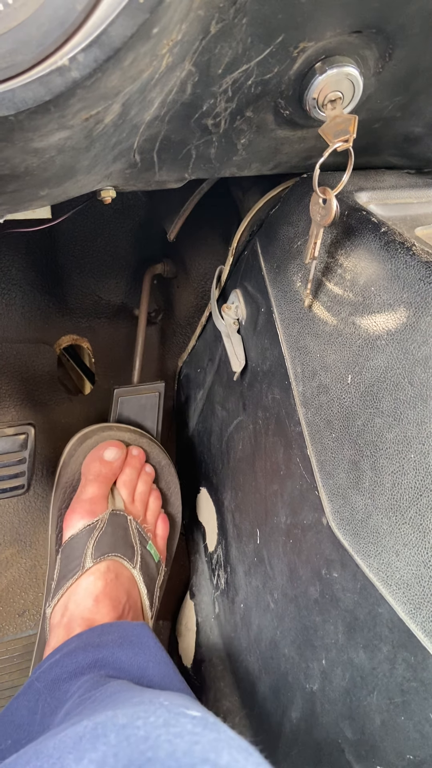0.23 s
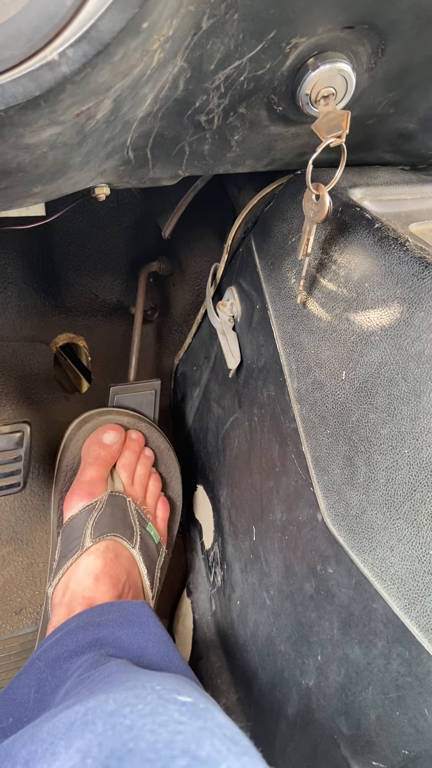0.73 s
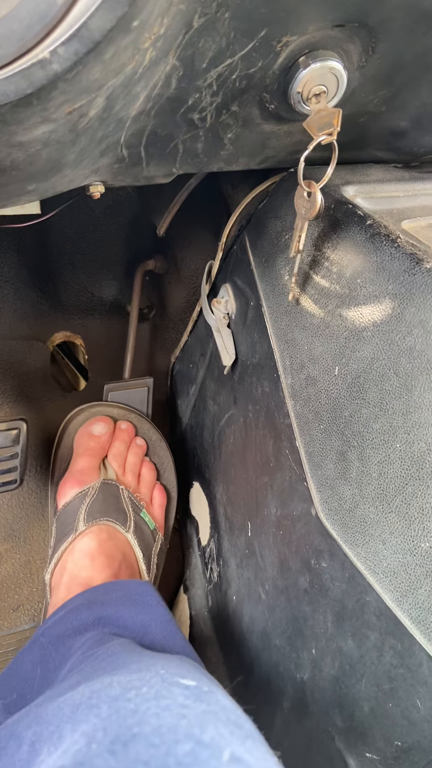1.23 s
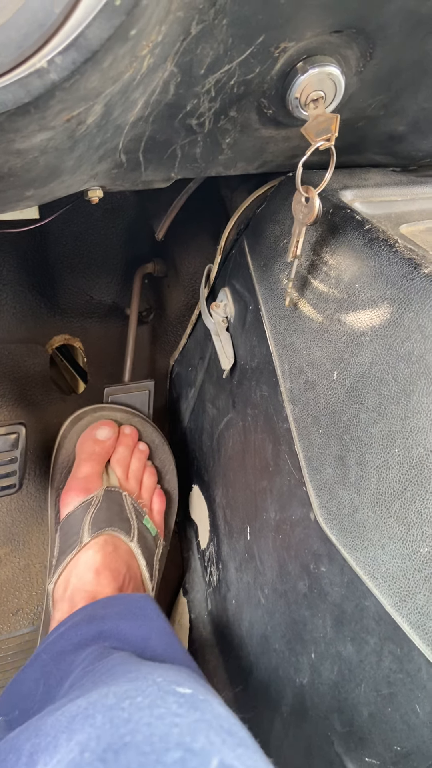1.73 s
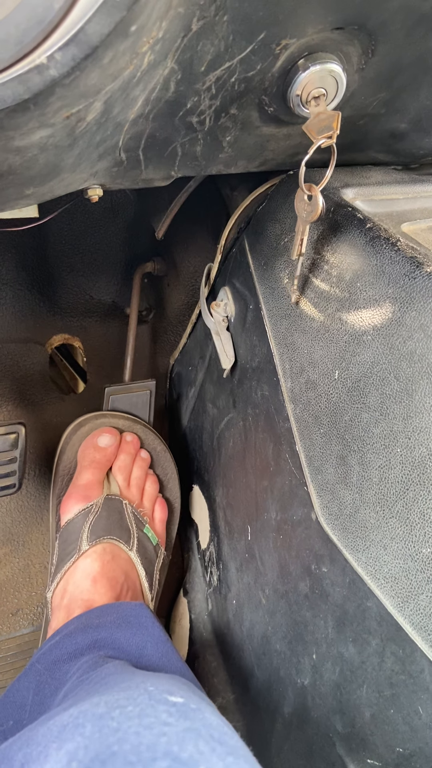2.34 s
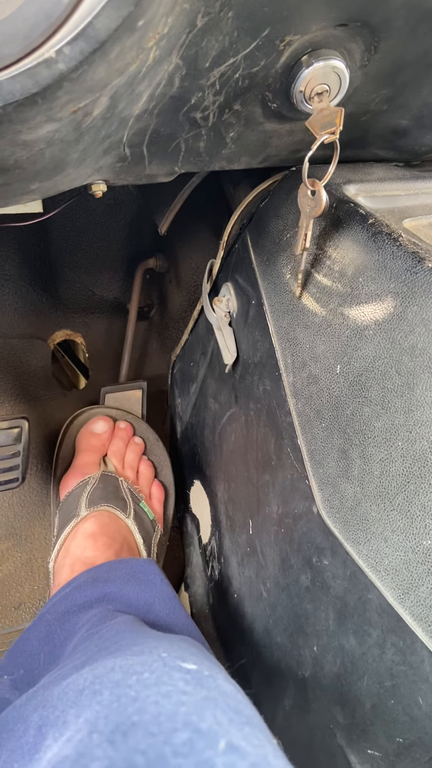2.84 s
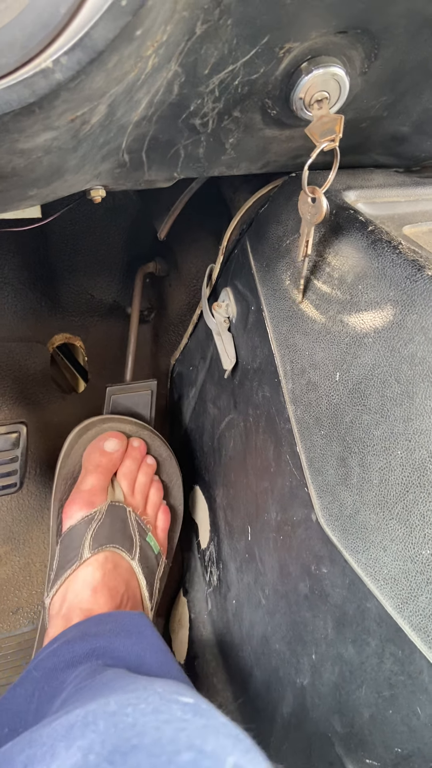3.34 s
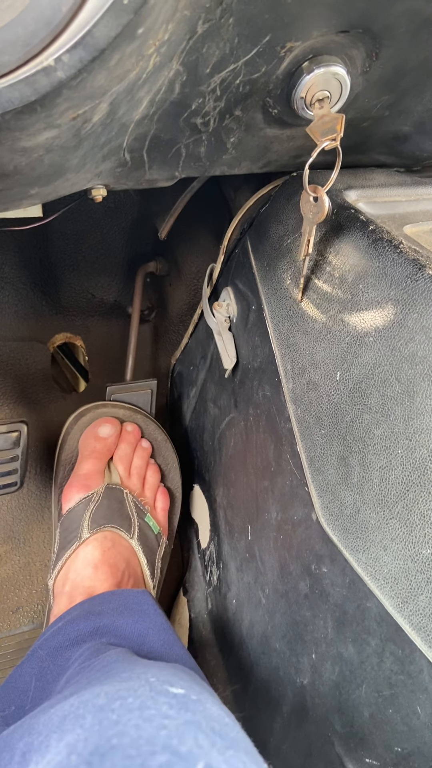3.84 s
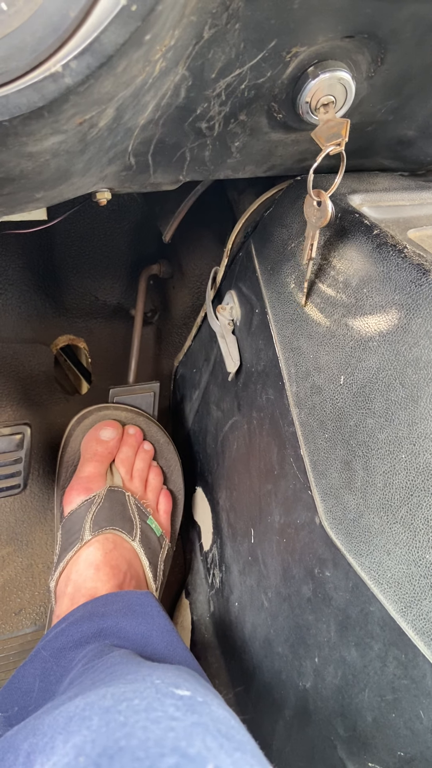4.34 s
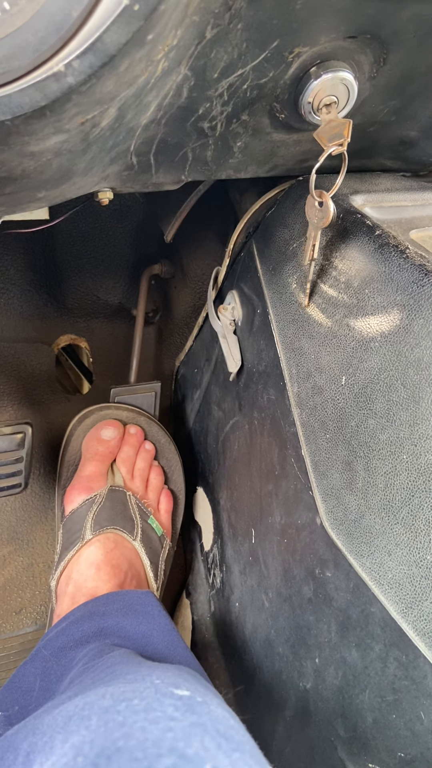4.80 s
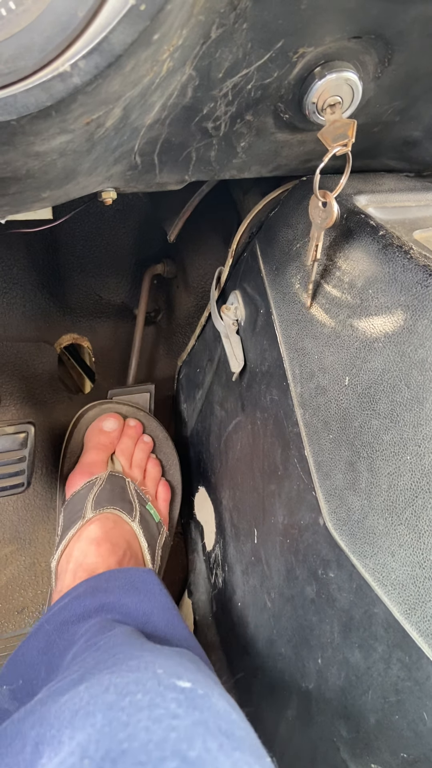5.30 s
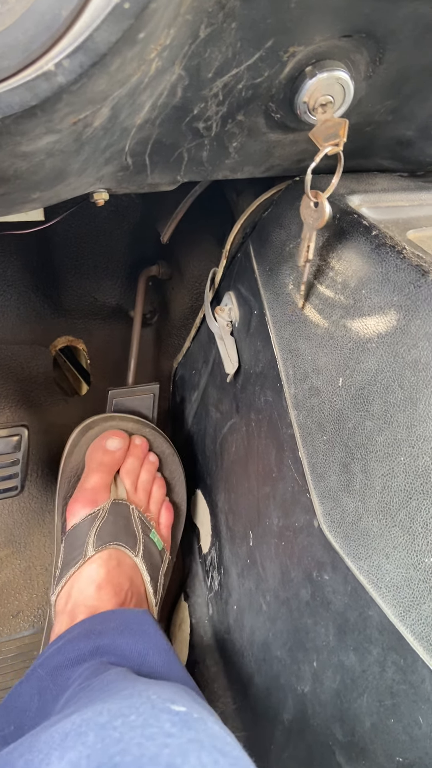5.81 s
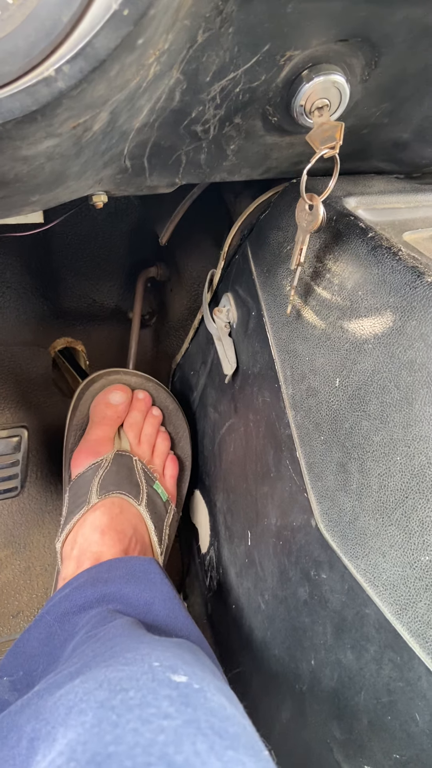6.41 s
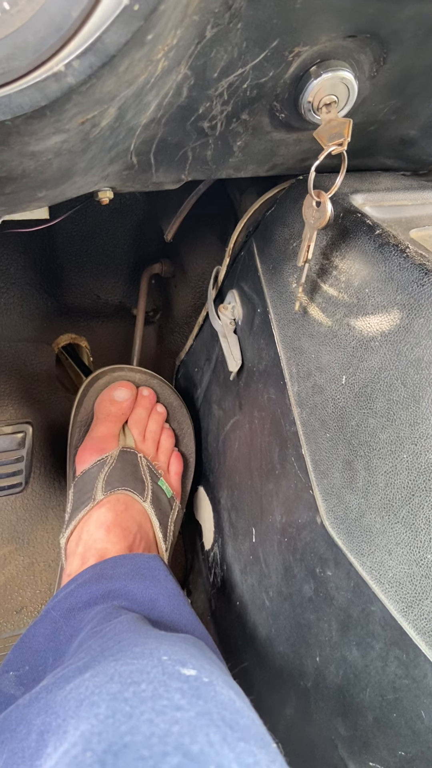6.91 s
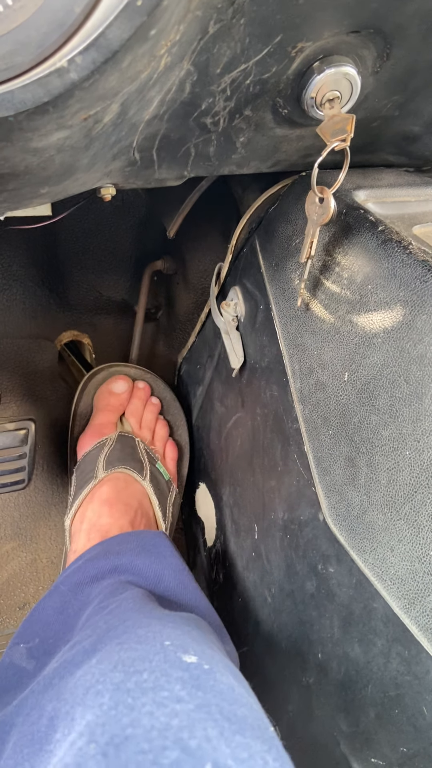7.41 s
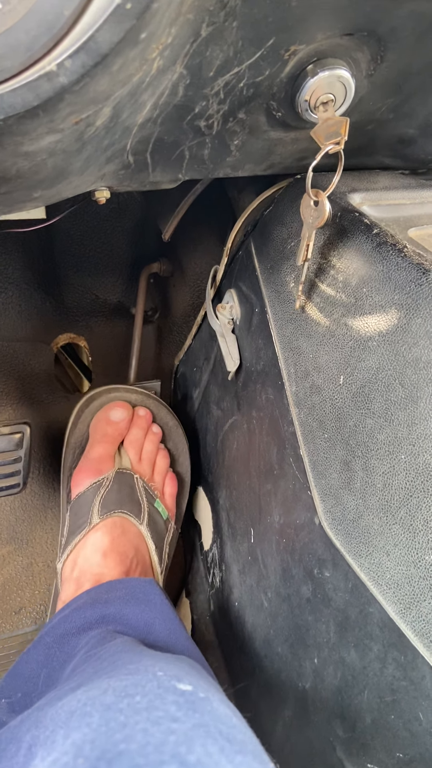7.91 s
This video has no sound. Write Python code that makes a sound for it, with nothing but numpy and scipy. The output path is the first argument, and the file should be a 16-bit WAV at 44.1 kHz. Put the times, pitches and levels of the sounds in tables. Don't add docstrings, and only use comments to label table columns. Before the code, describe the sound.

Close in the footwell of an old vehicle, a large cold engine is settling from an earlier rev, its belt squeal fading by 0.5 s. It idles slowly and unevenly, a deep cab boom under fan and valve rattle, with a few small metallic ticks around 0.8-1.2 s. Dry, very high hinge squeaks at 1.2-1.4 s lead into a gentle blip: hollow moan, modest roar peaking near 1.9 s, then a strong pulsing belt squeal to 2.25 s. Another squeak and sip of air at 2.55 s bring a hard rev, roaring from 3.0 to 3.3 s; revs fall and the belt chirps at 3.55-4.2 s. Idle returns. Squeaks at 5.05 s precede a third hard blip, loudest about 5.65 s, with belt squeal near 6.0-6.35 s. Final squeaks at 7.2 s, moan, roar peaking at 7.75 s, then falling revs and renewed squeal from 8 s.

```python
import sys
import numpy as np
from scipy import signal
from scipy.fft import rfft, irfft, next_fast_len
from scipy.io import wavfile
from scipy.ndimage import uniform_filter1d

SR = 44100
rng = np.random.default_rng(int(sys.argv[2]) if len(sys.argv) > 2 else 0)


def gain_from_db(level_db):
    decades = np.asarray(level_db, float) / 20
    return 10 ** decades


def master(y):
    cut = np.clip(np.atleast_2d(y).T, -1, 1)
    pcm = np.round(cut * 32767)
    wavfile.write(sys.argv[1], SR, pcm.astype(np.int16))


N = 359415
TIME = np.arange(N) / SR
FAST = next_fast_len(N, True)
HZ = np.fft.rfftfreq(FAST, 1 / SR) + 1e-3


def level(x, db):
    return x * gain_from_db(db) / np.sqrt(np.mean(x ** 2))


def over_hz(table):
    hz, value = np.transpose(table)
    return np.interp(np.log(HZ), np.log(np.maximum(hz, 1)), value)


def rings(table):
    return sum(gain_from_db(db) * 1j * HZ * w / (hz ** 2 - HZ ** 2 + 1j * HZ * w) for hz, w, db in table)


def shape(x, response):
    return irfft(rfft(x, FAST) * response, FAST)[..., :N]


def walk(rate):
    k = max(int(SR / rate), 1)
    held = np.repeat(rng.standard_normal(N // k + 1), k)[:N]
    return 1.3 * uniform_filter1d(uniform_filter1d(held, k), k)


def bumps(rows, width_s):
    return sum(db * np.exp(-((TIME - s) / width_s) ** 2) for s, db in rows)


def bursts(tables, column):
    rows = np.concatenate(tables)
    on = sum((TIME >= t[0][0]) & (TIME <= t[-1][0]) for t in tables)
    gate = uniform_filter1d(1. * on, size=300)
    gain = gain_from_db(np.interp(TIME, rows[:, 0], rows[:, column])) * gate
    return gain, np.interp(TIME, rows[:, 0], rows[:, column - 1])


def whistle(hz, parts, wobble, rate, patchy_db, rough):
    phase = 2 * np.pi * np.cumsum(hz * (1 + wobble * walk(rate))) / SR
    out = 0
    for k, db in parts:
        a, b = (rough * np.sqrt(k) * walk(4 * rate) for _ in range(2))
        partial = (1 + a) * np.sin(k * phase) + b * np.cos(k * phase)
        out = out + gain_from_db(patchy_db * walk(rate / 2)) * level(partial, db)
    return out


def rush(cycle, spectrum, resonances, ring_db, puff, grain_db):
    grit = rng.standard_normal(N) * gain_from_db(grain_db * walk(300)) * (1 + puff * np.cos(2 * np.pi * cycle))
    colour = gain_from_db(over_hz(spectrum)) * (1 + gain_from_db(ring_db) * rings(resonances))
    return level(shape(grit, colour), 0)


# pressed half way in seconds, floored in seconds, top speed in seconds,
# top firing rate in Hz, coasting time in seconds.
BLIPS = [
    (-.9, -.6, -.35, 160, .35),
    (1.358, 1.72, 1.9, 118, .19),
    (2.688, 3.02, 3.25, 171, .39),
    (5.162, 5.42, 5.65, 172, .29),
    (7.308, 7.55, 7.75, 172, .24),
]
# firing rate at half pedal in Hz, pedal released in seconds, boom in dB,
# roar at half pedal in dB, roar floored in dB.
EFFORT = [
    (78, -.19, -10, -37, -21),
    (78, 1.95, -13.5, -37.5, -31),
    (79, 3.3, -9.5, -37.5, -22),
    (78.5, 5.73, -11, -40, -21.5),
    (88, 7.8, -11.5, -36.5, -22),
]
COLD_IDLE_HZ, WARM_IDLE_HZ, WARMING_S, PICK_UP_S = 59.5, 64.5, (1.3, 3), .09


def speed():
    idle = np.interp(TIME, WARMING_S, [COLD_IDLE_HZ, WARM_IDLE_HZ])
    hz = idle
    for (press, floor, top, top_hz, coast), (half_hz, *_) in zip(BLIPS, EFFORT):
        rise = np.interp(TIME, [press, press + PICK_UP_S, floor, top],
                         [WARM_IDLE_HZ, half_hz - 1, half_hz + 1, top_hz])
        fall = idle + (top_hz - idle) / np.cosh((TIME - top) / coast)
        hz = np.where(TIME >= press, np.where(TIME < top, rise, fall), hz)
    return hz


# frequency in Hz, density in dB per Hz.
RATTLE = [(120, -3), (200, -14.5), (270, -6), (360, -12.5), (550, -17), (1100, -21.5), (1900, -26.5),
          (3400, -32), (5500, -32), (7400, -32.5), (10000, -36.5), (13000, -33), (15500, -38), (16100, -78)]
# frequency in Hz, width in Hz, level in dB.
RATTLE_RINGS = [(272, 25, -5), (560, 70, 1), (700, 90, -1), (970, 50, .6), (1940, 110, 3), (2060, 70, 1),
                (3150, 120, -4)]
# frequency in Hz, width in Hz, level in dB.
TAPPET = [(970, 35, 0), (1960, 70, -14)]
# time in seconds, peak level in dB.
TICKS = [
    (0.7966, -39),
    (0.9164, -30),
    (1.0415, -26.5),
    (1.1672, -44),
]
RATTLE_DB = -35.2


def valve_gear(hz, turns):
    rattle = rush(turns, RATTLE, RATTLE_RINGS, ring_db=3.5, puff=0.069, grain_db=0.0)
    rattle_db = RATTLE_DB + 2.5 * np.log2(hz / 70) + 0.88 * walk(9.6)
    ticks = np.zeros(N)
    for s, db in TICKS:
        start = int(s * SR)
        ticks[start:start + 12] = gain_from_db(db + 30) * np.hanning(12)
    return gain_from_db(rattle_db) * rattle + shape(ticks, rings(TAPPET))


# start in seconds, length in seconds, pitch in Hz, glide in Hz, level in dB.
SQUEAK = [
    (1.22, .09, 10100, 420, -38),
    (1.316, .022, 10540, 40, -42),
    (1.33, .085, 12150, -750, -48),
    (1.555, .055, 5250, 500, -33),
    (2.548, .06, 10100, 360, -42),
    (5.025, .055, 10300, 100, -37),
    (5.068, .055, 11950, -200, -38),
    (7.165, .1, 10250, 320, -34),
    (7.278, .022, 11800, 100, -44),
]


def pedal():
    shapes = [[(s, hz, db - 18), (s + .3 * long, hz + .3 * glide, db - 6),
               (s + .6 * long, hz + .6 * glide, db), (s + long, hz + glide, db - 16)]
              for s, long, hz, glide, db in SQUEAK]
    out = 0
    for k in (0, 1):
        gain, hz = bursts(shapes[k::2], column=2)
        out = out + gain * whistle(hz, [(1, 0)], wobble=.002, rate=100, patchy_db=2.5, rough=.3)
    return out


# start in seconds, end in seconds, squeal at the start in dB, squeal at the end in dB,
# octave chirp relative to the squeal in dB.
BELT = [
    (-.1, .5, -28, -33, -4),
    (1.7, 2.25, -23, -33, -1.5),
    (3.55, 4.2, -31, -37, -.5),
    (5.93, 6.35, -29.5, -34, -2.5),
    (8.0, 8.4, -31, -33, -1.5),
]
# tightest moment in seconds, lap time in seconds.
LAPS = [
    (.247, .101),
    (2.113, .098),
    (3.882, .093),
    (6.14, .09),
    (8.077, .082),
]
GRIP_S, GRIP_DB = .15, -26


def laps():
    slip = np.searchsorted([row[0] - .1 for row in BELT[1:]], TIME)
    tight, lap_s = np.array(LAPS)[slip].T
    late = (TIME > 1.6) & (TIME < 2)
    swing = .5 + .5 * np.tanh(1.3 * np.cos(2 * np.pi * (TIME - tight) / lap_s) + .3 + 4 * late)
    rows = np.array(BELT)[slip].T
    grip = np.clip(1 - (rows[1] - TIME) / GRIP_S, 0, 1) * (1 - swing)
    return rows, late, swing, grip


# frequency in Hz, width in Hz, level in dB.
PULLEY = [(1270, 70, -9), (1455, 70, 0), (2460, 120, 0), (2670, 80, -2), (2970, 100, 0), (3150, 90, -1),
          (4500, 500, -2)]
# time in seconds, dip in dB.
LATE_CHIRP = [
    (1.7, -5),
    (3.58, -13),
    (3.66, -5),
    (4.04, -5),
    (4.17, -14),
    (6.31, -5),
    (8.02, -6),
]
SLACK_HZ, TIGHT_HZ = 1240, 1520
PULL_CHIRP_DB, LAST_CHIRP_S, LAST_CHIRP_DB = -8, .09, -13


def belt():
    (start, end, first_db, last_db, chirp_db), late, swing, grip = laps()
    hz = SLACK_HZ + (TIGHT_HZ - SLACK_HZ) * swing
    ring = .12 + np.abs(rings(PULLEY))
    squeal = whistle(hz, [(1, 0), (3, -21)], wobble=.015, rate=130, patchy_db=1.5, rough=1.3)
    chirp = whistle(2 * hz, [(1, 0)], wobble=.025, rate=190, patchy_db=2.2, rough=2.5)
    squeal = level(shape(squeal, ring), 0.53)
    chirp = level(shape(chirp, ring), 0.73)
    db = first_db + (last_db - first_db) * (TIME - start) / (end - start)
    db = db + GRIP_DB * grip + 1.3 * walk(18)
    gain = gain_from_db(db) * uniform_filter1d(1. * ((TIME > start) & (TIME < end)), size=900)
    ending = np.clip(1 - (end - TIME) / LAST_CHIRP_S, 0, 1)
    chirp_db = chirp_db + PULL_CHIRP_DB * late + .4 * GRIP_DB * grip + LAST_CHIRP_DB * ending
    chirp_db = chirp_db + 1.3 * walk(25) + bumps(LATE_CHIRP, .06)
    return gain * (squeal + gain_from_db(chirp_db) * chirp)


# firing rate in Hz, level in dB.
COAST_HISS = [(75, -68), (86, -57), (105, -43), (135, -37), (172, -30)]
HALF_BRIGHT_DB, FULL_BRIGHT_DB, SHUT_BRIGHT_DB = -5.5, 2.6, -2.5
OPEN_S, SHUT_DB_PER_S, HALF_SWELL_DB, CRACK_S, CRACK_DB = .055, 68, 6.5, .012, -4


def throttle(speed_hz):
    pedal_db, bright = np.full(N, -90.), []
    for (press, floor, top, *_), (_, shut, _, half, full) in zip(BLIPS, EFFORT):
        held = np.interp(
            TIME, [press, press + CRACK_S, floor - 1.6 * OPEN_S, floor, floor + OPEN_S, top],
            [half + CRACK_DB, half, half - 1.5, half + HALF_SWELL_DB, full - 1.5, full])
        closing_db = SHUT_DB_PER_S * np.maximum(TIME - shut, 0)
        pedal_db = np.where(TIME >= press, held - closing_db, pedal_db)
        openness = np.clip((full + 32) / 10.5, 0, 1)
        top_bright = HALF_BRIGHT_DB + (FULL_BRIGHT_DB - HALF_BRIGHT_DB) * openness
        bright += [(press - .01, SHUT_BRIGHT_DB), (press, HALF_BRIGHT_DB), (floor, HALF_BRIGHT_DB),
                   (top, top_bright), (shut + .2, SHUT_BRIGHT_DB)]
    coasting = sum((TIME > e[1]) & (TIME < b[0]) for e, b in zip(EFFORT, BLIPS[1:] + [(9,)]))
    coast_db = np.interp(speed_hz, *np.transpose(COAST_HISS)) + .6 * GRIP_DB * laps()[-1]
    gain = np.maximum(gain_from_db(pedal_db), coasting * gain_from_db(coast_db))
    return uniform_filter1d(gain, size=300), np.interp(TIME, *np.transpose(bright))


# frequency in Hz, density in dB per Hz.
ROAR = [(120, -27), (200, -11), (330, -15.5), (550, -4.0), (1100, -5), (1900, -5.5), (3400, -10),
        (5500, -16.5), (7400, -12.5), (10000, -19), (13000, -20.5), (15500, -23), (16100, -62.5)]
# frequency in Hz, width in Hz, level in dB.
ROAR_RINGS = [(553, 35, -5), (1270, 60, -8), (1455, 73, 1), (2063, 44, 1.5), (2430, 60, -7),
              (3840, 100, 4.5), (4320, 50, -2), (4700, 120, .3), (5230, 60, -6), (5650, 160, -2)]
# multiple of the pitch, level in dB.
MOAN_PARTS = [(1, 0), (2, -13), (3, -18), (5, -21), (6, -23)]
# half pedal in dB, floored in dB, last gasp in dB, end in seconds.
MOANS = [
    (-24, -25, -29, 2.05),
    (-23.5, -39, -34, 3.62),
    (-25, -34, -30, 5.94),
    (-24, -38, -30, 8.04),
]
# time in seconds, dip in dB.
MISFIRES = [
    (1.385, -9),
    (2.872, -14),
    (5.335, -4),
]
# start in seconds, length in seconds, centre in Hz,
# level at first in dB, level at last in dB.
SIP = [
    (2.55, .14, 830, -34, -33),
    (5.05, .11, 750, -30, -35),
    (7.14, .168, 880, -42, -31),
]
MOAN_HZ, MOAN_SAG_HZ, GASP_S = 787, 25, .09


def intake(cycle, speed_hz):
    roar = rush(cycle, ROAR, ROAR_RINGS, ring_db=7, puff=0.25, grain_db=2.0)
    low = shape(roar, 1 / (1 + 1j * HZ / 1200) ** 2)
    misfire = gain_from_db(bumps(MISFIRES, .012))
    sagged = MOAN_HZ - MOAN_SAG_HZ
    moans = [[(press, MOAN_HZ, half - 1.5), (floor, MOAN_HZ - MOAN_SAG_HZ / 2, half + 2.5),
              (floor + .11, sagged, full), (end - 1.6 * GASP_S, sagged, full),
              (end - GASP_S, sagged, gasp), (end - .03, MOAN_HZ, gasp), (end, MOAN_HZ, gasp - 15)]
             for (press, floor, *_), (half, full, gasp, end) in zip(BLIPS[1:], MOANS)]
    gain, hz = bursts(moans, column=2)
    moan = whistle(hz * (1 + .012 * walk(12)), MOAN_PARTS, wobble=.01, rate=55, patchy_db=1.5, rough=.45)
    moan = gain * gain_from_db(1.2 * walk(14) - .3) * moan
    sips = [[(s, f, db - 22), (s + .03, f, db), (s + long, f, last)] for s, long, f, db, last in SIP]
    sip_gain, hz = bursts(sips, column=2)
    sip = whistle(hz * (1 + .02 * walk(25)), [(1, -1)], wobble=.06, rate=60, patchy_db=1.5, rough=1.5)
    gain, bright_db = throttle(speed_hz)
    gain = gain + gain_from_db(-24) * sip_gain
    bright_db = bright_db + 1.2 * walk(16)
    coloured = roar - low + gain_from_db(-bright_db) * low
    unsteady = gain_from_db(6 + .6 * walk(10) + .9 * walk(30))
    return misfire * (gain * unsteady * coloured + moan) + sip_gain * sip


# time in seconds, change in dB.
LURCHES = [(0, 6), (.13, -4), (1.5, 5.5), (1.68, 6), (1.77, -3), (1.84, 3), (2.72, 3), (3.21, -2.5),
           (3.45, 6), (3.56, -3), (3.79, 4), (3.97, 3), (4.04, -3.5), (5.2, 5), (5.31, -5), (5.4, 3.5),
           (5.54, 2.5), (5.92, 3), (6.13, 6), (6.27, 3), (7.4, 4), (7.49, -2.5), (7.64, 1.5), (7.81, -3.5),
           (7.99, 3), (8.15, -5)]
IDLE_BOOM_DB, COAST_BOOM_DB, LUG_DB = -17.3, -19.5, 3.3
LOAD_S, UNLOAD_S, RECOVER_S = .06, .09, .6


def load_db(hz):
    rows = []
    for (press, *_), (_, shut, db, *_) in zip(BLIPS, EFFORT):
        rows += [(press, IDLE_BOOM_DB), (press + LOAD_S, db), (shut, db),
                 (shut + UNLOAD_S, COAST_BOOM_DB - .9 * (db + 10.5)), (shut + RECOVER_S, IDLE_BOOM_DB)]
    lug_db = np.clip(66.5 - hz, 0, LUG_DB)
    return np.interp(TIME, *np.transpose(rows)) + lug_db + bumps(LURCHES, .035)


# multiple of the firing rate, level in dB.
ORDER = [(.5, -5), (.625, -8), (.75, -3), (1, 3), (1.375, -9), (1.75, -2.5), (2, -2.5), (2.375, -4),
         (2.875, -4), (3, 2.5)]
# frequency in Hz, response in dB.
CAB = [(18, -43), (30, -23), (45, -4), (60, 1), (76, -1.5), (97, -10.5), (113, -2), (135, -8.5), (158, -17),
       (188, -24), (235, -26.5), (272, -24.5), (330, -36.5), (500, -74)]
LOPE_HZ, LOPE_DB = 92, 6.5


def firings(hz, level_db):
    turns = np.cumsum(hz * (1 + .008 * walk(12))) / SR
    bark_db = .45 * (level_db + 15)
    even_db = np.clip(3 * (hz - 66), -9, 0)
    lope_db = LOPE_DB * np.exp(-(np.log(hz / LOPE_HZ) / .25) ** 2)
    tones = 0
    for k, db in ORDER:
        tone_db = db + k * bark_db + (k != 1) * even_db + (k < 1) * lope_db + 2.0 * walk(7.9)
        tones = tones + gain_from_db(tone_db) * np.sin(2 * np.pi * (k * turns + rng.random()))
    fired = np.diff(np.floor(turns), prepend=0.) * rng.standard_normal(N) / np.sqrt(hz)
    cab = gain_from_db(over_hz(CAB))
    steady_db = 8.5 - 5 * np.log2(hz / 65)
    steady = level(shape(tones / gain_from_db(bark_db), cab), 0)
    boom = steady * gain_from_db(steady_db) + level(shape(fired, cab), 0)
    slow_power = uniform_filter1d(uniform_filter1d(boom ** 2, size=4000), size=4000)
    return gain_from_db(level_db) * boom / np.sqrt(slow_power), turns


# frequency in Hz, left lead in half cycles, left minus right in dB.
PORTS = [(0, 0, -1.1), (200, 0, -1.8), (400, .03, -4), (550, .25, -3), (800, .15, 3.5), (1050, -.1, -1.5),
         (1900, .05, 0), (2300, .3, -1), (3900, .33, -3.5), (5000, 0, 0), (7100, 1, 0), (7750, 1, 0),
         (9900, 2, 0), (11000, 2, 0), (13000, 3, 0), (14200, 3, 0), (15600, 4, 0)]
# frequency in Hz, level in dB.
DIFFUSE = [(100, -35), (250, -4), (600, -4.5), (1500, -3), (4000, -4), (12000, -3)]


def scene():
    hz = speed()
    boom, turns = firings(hz, load_db(hz))
    cab = valve_gear(hz, turns) + pedal() + belt() + intake(turns, hz) + boom
    port_hz, lead, pan_db = np.transpose(PORTS)
    lead = np.pi * np.interp(HZ, port_hz, lead)
    half = gain_from_db(np.interp(HZ, port_hz, pan_db) / 2) * np.exp(.5j * lead)
    tail = rng.standard_normal(9000) * np.exp(-np.arange(9000) / 1800)
    free = np.where(HZ > 6000, np.abs(np.sin(lead)), 1)
    scatter = free * gain_from_db(over_hz(DIFFUSE)) * rfft(tail, FAST) / np.sqrt(np.sum(tail ** 2))
    return shape(cab, np.array([half * (1 + scatter / 2), (1 - scatter / 2) / half]))


def roll_off(x):
    return signal.sosfilt(signal.butter(12, 17060, fs=SR, output="sos"), x)


def record(dry):
    rounded = dry / (1 + np.abs(dry) ** 4) ** .25
    return roll_off(rounded)


dry = scene()
out = record(dry)
master(out)
```